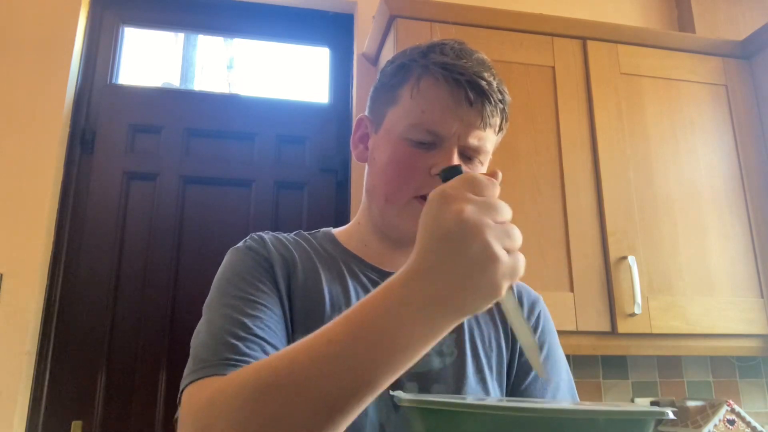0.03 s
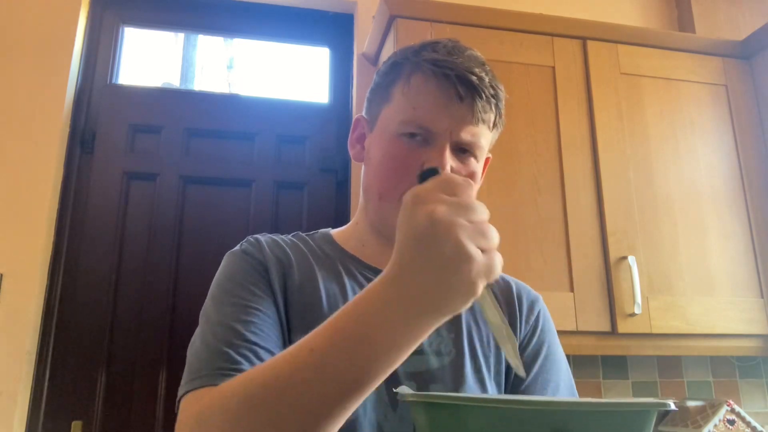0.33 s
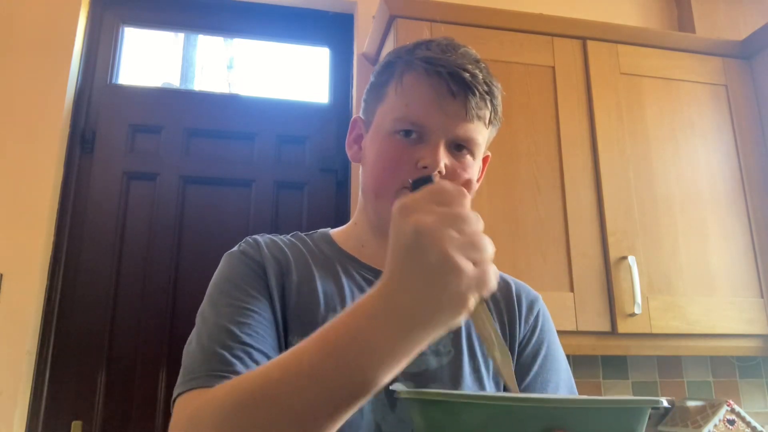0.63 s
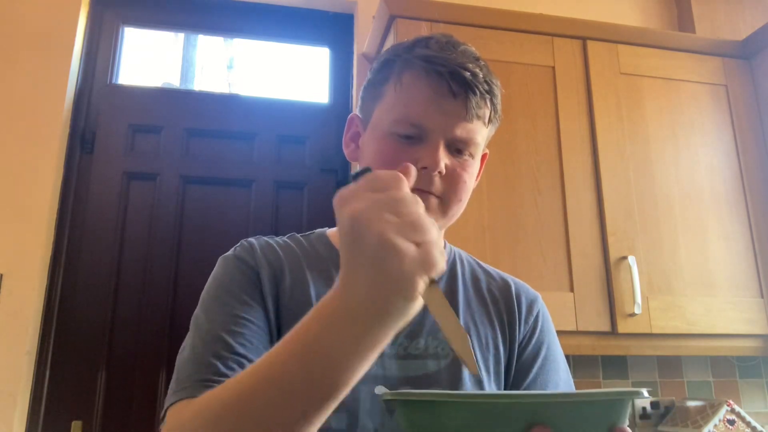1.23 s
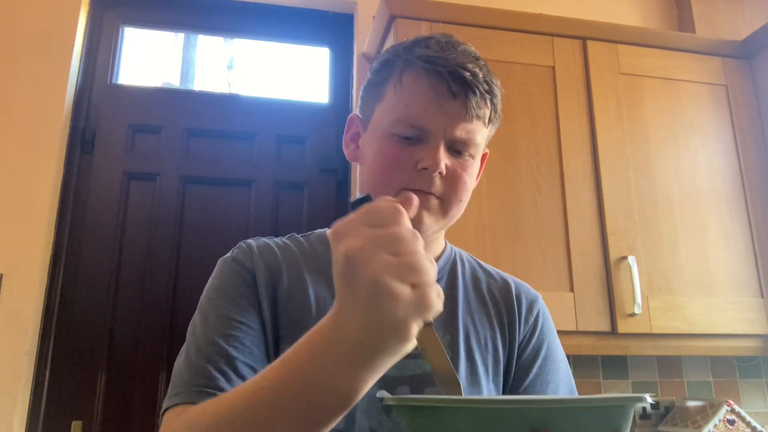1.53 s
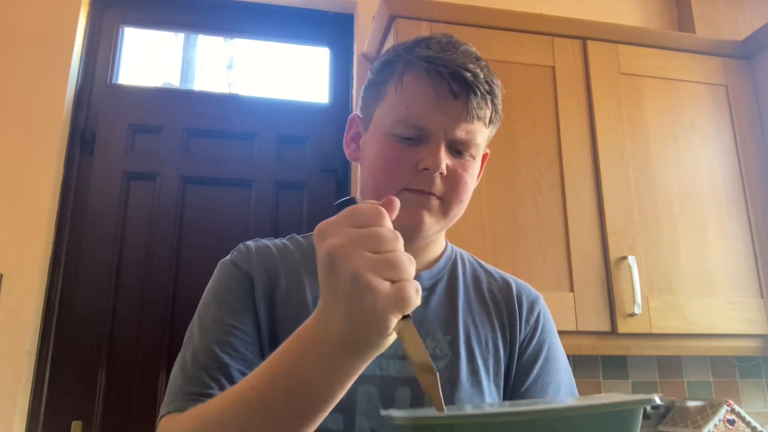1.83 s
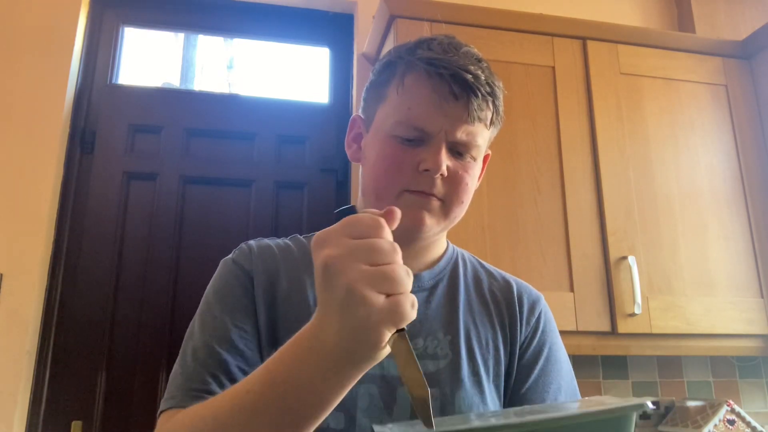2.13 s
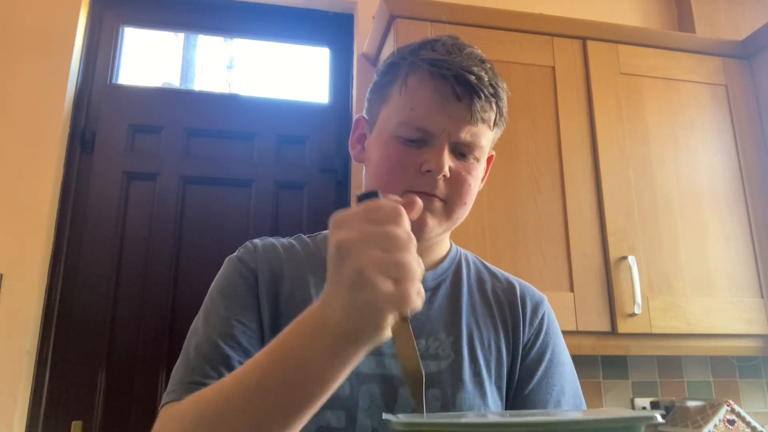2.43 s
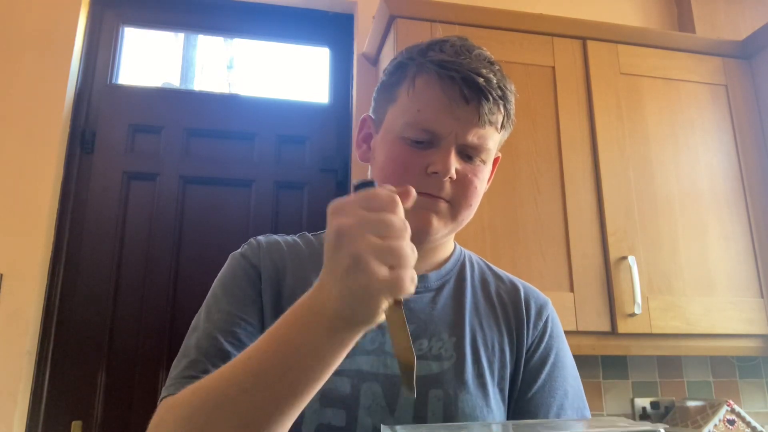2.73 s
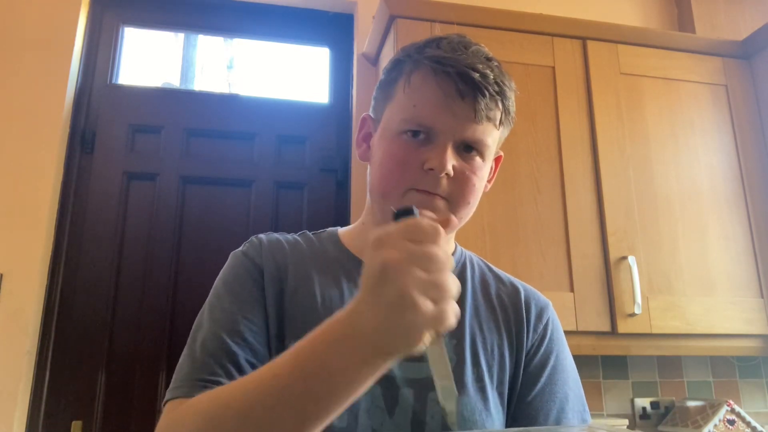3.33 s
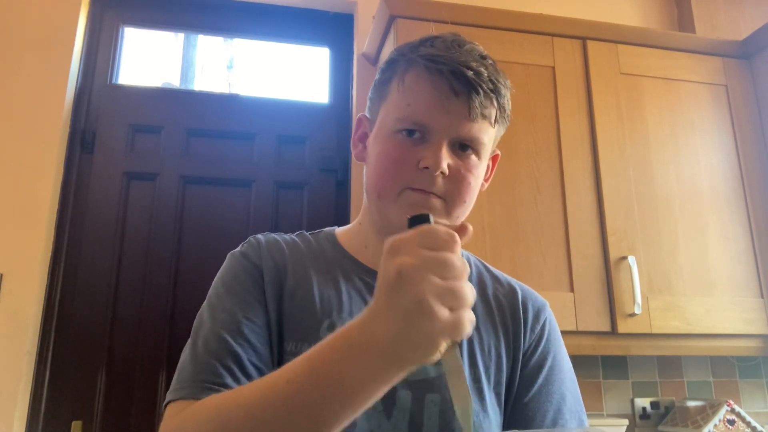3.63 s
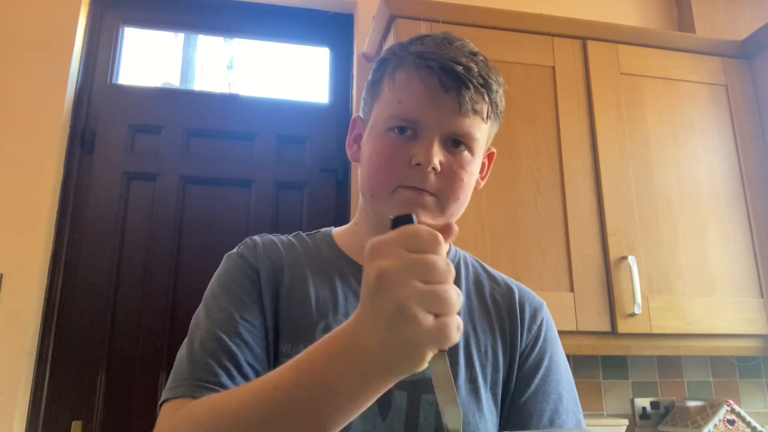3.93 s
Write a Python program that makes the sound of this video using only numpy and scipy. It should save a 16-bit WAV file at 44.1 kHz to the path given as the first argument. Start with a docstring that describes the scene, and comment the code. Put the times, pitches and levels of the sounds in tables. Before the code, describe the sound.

Sharp knife stabs crack into a plastic lid in two runs, close in a kitchen.

```python
"""A kitchen knife stabs repeatedly into the lid of a plastic tub, close to the microphone.
Each stab cracks sharply, rings the lid and pushes a falling thud out of the tub.
A brief, dull pre-echo from the recorder's processing leads into each crack.
Between stabs the blade scuffs the lid and ticks softly.
A hard-walled kitchen adds echoes and a short tail over a faint house rumble."""
import sys
import numpy as np
from scipy import signal
from scipy.fft import rfft, irfft, next_fast_len
from scipy.io import wavfile
from scipy.ndimage import uniform_filter1d

SR = 44100
rng = np.random.default_rng(int(sys.argv[2]) if len(sys.argv) > 2 else 0)


def inscribe(sig):
    """Save sig as 16-bit PCM at rate SR to the path in sys.argv[1].

    A 1-D sig is mono; a 2-D sig holds one channel per row.
    Samples are clipped to [-1, 1] before scaling.
    """
    pcm = np.round(np.clip(np.atleast_2d(sig).T, -1, 1) * 32767)
    wavfile.write(sys.argv[1], SR, pcm.astype(np.int16))


N = 176400
LEAD_IN = SR // 4  # samples before time zero
SPAN = N + LEAD_IN
SIZE = 8192  # samples per event
HZ = np.fft.rfftfreq(SIZE, 1 / SR)
T = np.arange(SIZE) / SR

# Knife stabs: start_s, level_db, hollow_db, knock_db, treble_db, low_ring_hz, high_ring_hz,
# thud_db, thud_pitch (proportional to the thud's end frequency)
STABS = [(-.115, -4, -1, 1, 1, 1070, 1960, -14, 110), (0.1444, -2, -3.5, -8.5, 0.5, 1140, 2020, -4.5, 120),
         (0.4081, -2, -13.5, -1.5, 3, 1240, 1975, -6, 101),
         (0.6658, -3.5, 5.5, -3, 4, 1160, 1900, -6.5, 105),
         (1.109, -4, 4.5, -5, 3.5, 1030, 1800, -1.5, 106), (1.4743, -3, 3.5, -7, 5, 1270, 2690, -3, 125),
         (2.4632, -3.5, -2, 4.5, 4, 850, 2745, -6.5, 113),
         (2.8225, -0.87, -1.5, -1, 2.2, 1130, 1930, -14.5, 110),
         (3.1069, 0.14, 3, -2, 2, 830, 1930, -11, 98), (3.374, .5, 7.5, -4.5, 3, 1110, 1920, -3.5, 102),
         (3.6728, -2, -1, -3.5, 2.5, 1290, 1920, -4, 126), (3.9086, -4.5, -2.5, -2, 6, 1050, 2100, -6, 153)]
# Lid crack spectrum: freq_hz, gain_db
CRACK_SPECTRUM = [(60, -12.5), (150, -12.5), (280, -1), (450, -7.5), (680, 3), (1100, 3.5), (1900, 3.5),
                  (2900, 1.5), (4300, 2.5), (5900, 2), (8300, -1.5), (10500, -6.5), (14000, -10.5),
                  (16000, -26)]
CRACK_DB = 13.5


def stabs(thud_gain_db=-20, thud_delay_s=0.0013):
    """The knife pierces the lid, ringing lid and tub. Returns cracks, stereo pre-echoes, thuds."""
    # Tub resonances: centre_hz, width_hz, peak_db
    tub_modes = [(635, 35, 7), (950, 35, 3), (1070, 40, 5), (1225, 30, 5), (1335, 30, 4), (1465, 35, 4),
                 (1700, 50, 2), (2830, 200, 3), (3750, 250, 2)]
    cracks, thuds, pre_echoes = np.zeros(SPAN), np.zeros(SPAN), np.zeros((2, SPAN))
    body_db = CRACK_DB + curve(CRACK_SPECTRUM, HZ) + sum(resonance_db(*mode) for mode in tub_modes)
    for start_s, level_db, hollow_db, knock_db, treble_db, low_hz, high_hz, thud_db, thud_pitch in STABS:
        tint = [(200, 0.022), (430, hollow_db), (900, knock_db),
                (1600, 0.021), (5000, 0), (9000, treble_db)]
        lid_db = resonance_db(low_hz, width_hz=190, peak_db=2)
        lid_db += resonance_db(high_hz, width_hz=260, peak_db=5)
        gain_db = level_db + body_db + curve(tint, HZ) + lid_db
        add(cracks, start_s, colour(snap(), gain_db))
        add(thuds, start_s + thud_delay_s, amp(thud_gain_db + thud_db) * thud(end_hz=0.65 * thud_pitch))
        for channel in pre_echoes:
            smear = pre_echo(gain_db)
            add(channel, start_s - len(smear) / SR, smear)
    return cracks, pre_echoes, thuds


def snap(hold_s=0.0016, decay_s=0.0016, grain_db=3.5, first_snap_db=-4):
    """The point breaks through with one snap; the plastic tears in a few ms of smaller ones."""
    envelope = np.exp(-np.maximum(T - hold_s, 0) / decay_s)
    noise = rng.standard_normal(SIZE)
    grain = amp(grain_db * np.clip(rng.standard_normal(SIZE), -2, 2))
    snaps = unit(noise * grain * envelope) + amp(first_snap_db) * (T == 0)
    return unit(whiten(snaps, bins=24) * np.sqrt(envelope))


def resonance_db(centre_hz, width_hz, peak_db):
    """Gain curve of one lid or tub mode."""
    return 10 * np.log10(1 + (amp(peak_db) ** 2 - 1) / (1 + (2 * (HZ - centre_hz) / width_hz) ** 2))


def thud(end_hz, start_hz=344, sag_s=0.0047, rise_s=0.0014, decay_s=0.015):
    """The tub is pushed down; its note falls as the lid slackens."""
    pitch_hz = end_hz + (start_hz - end_hz) * np.exp(-T / sag_s)
    envelope = (1 - np.exp(-T / rise_s)) * np.exp(-T / decay_s)
    return -np.sin(2 * np.pi * np.cumsum(pitch_hz) / SR) * envelope


def pre_echo(crack_db, relative_db=-14, rise_s=0.0054, top_hz=7600):
    """The recorder's processing smears dull noise ahead of a crack."""
    lowpass_db = -10 * np.log10(1 + (HZ / top_hz) ** 20)
    noise = unit(rng.standard_normal(SIZE) * np.exp(-T / rise_s))
    return colour(noise, crack_db + lowpass_db + relative_db)[:SIZE // 2][::-1]


def blade_scuffs(decay_s=0.021):
    """The blade knocks and scuffs the lid as it is drawn out."""
    # Light blade contacts: start_s, level_db, bass_db, treble_db
    touches = [(.300, -31, -12, -4), (.895, -31, 13, -15.5), (1.791, -28, 6.5, -11.5),
               (1.807, -41, 28, -16), (1.955, -43.5, 0.5, -13), (2.025, -49, -18.5, -14),
               (2.119, -49.5, 0, -11), (2.208, -46, 2, -12), (3.83, -23.5, 0, -4)]
    out = np.zeros(SPAN)
    for start_s, level_db, bass_db, treble_db in touches:
        tint_db = curve([(170, bass_db), (500, 0), (2500, 0.014), (8000, treble_db)], HZ)
        noise = rng.standard_normal(SIZE) * np.exp(-T / decay_s)
        scuff = unit(whiten(noise, bins=30) * np.exp(-T / decay_s / 10))
        add(out, start_s, colour(scuff, CRACK_DB + level_db + curve(CRACK_SPECTRUM, HZ) + tint_db))
    return out


def knife_ticks():
    """Tiny bright ticks of the knife in the hand."""
    # Dry ticks: start_s, level_db
    ticks = [(2.079, -34), (2.175, -38.5), (2.209, -41)]
    tint_db = curve([(750, -12), (1500, 0), (9000, -2), (15000, -8)], HZ)
    out = np.zeros(SPAN)
    for start_s, level_db in ticks:
        add(out, start_s, colour(snap(), level_db + tint_db))
    return out


def early_echoes(x):
    """Nearby surfaces return delayed copies to each side."""
    # Reflections: left_delay_s, right_delay_s, gain_db
    echoes = [(.0021, .0030, -9), (.0080, .0079, -8), (.0135, .0152, -28)]
    return sum(amp(gain_db) * np.array([delay(x, left_s), delay(x, right_s)])
               for left_s, right_s, gain_db in echoes)


def kitchen_tail(x, onset_s=0.0013, variants=4):
    """Dense reverberation, each band decaying at its own rate; stabs cycle through random tails."""
    # Room decay: freq_hz, t60_s
    room_t60 = [(80, 0.2), (210, 0.48), (560, 0.4), (1470, 0.44), (3880, 0.43), (7000, 0.4), (10200, 0.32),
                (15000, 0.21)]
    # Tone of the tail, with a recorder notch near 11.5 kHz: freq_hz, gain_db
    tail_tone = [(80, -2.5), (200, -7), (420, 1), (700, -1.5), (1400, 1), (2800, 2), (4400, 3), (6200, -9),
                 (9000, 5.5), (11500, -10), (14000, 7.5)]
    t, hz = np.arange(SR) / SR, np.fft.rfftfreq(SR, 1 / SR)
    onset = 1 - np.exp(-(t / onset_s) ** 2)
    stab_number = np.searchsorted([row[0] - .02 for row in STABS], np.arange(-LEAD_IN, N) / SR)
    out = np.zeros((2, SPAN))
    for k in range(variants):
        band_hz, frame_s, noise = signal.stft(rng.standard_normal((2, SR)), SR, nperseg=256)
        decay = 1000. ** (-frame_s / curve(room_t60, band_hz)[:, None])
        tails = signal.istft(noise * decay, SR, nperseg=256)[1][:, :SR]
        left, other = (rfft(unit(whiten(tail * onset, bins=200) * onset * (t < .8))) for tail in tails)
        response = irfft(room_stereo(left, other, hz) * amp(curve(tail_tone, hz)))[:, :SR * 3 // 4]
        send = x * (stab_number % variants == k)
        out += signal.fftconvolve(send[None], response, axes=1)[:, :SPAN]
    return out


def house_rumble(level_db=-64.5):
    """Quiet, steady low noise of the house."""
    # Background spectrum: freq_hz, relative_density_db
    floor_spectrum = [(20, -19), (40, -11.5), (60, 2.5), (100, -3.5), (200, -6.5), (300, -3), (450, -19.5),
                      (1000, -26), (3000, -45), (8000, -42), (16000, -48.5)]
    hz = np.fft.rfftfreq(N, 1 / SR)
    left, other = rfft(rng.standard_normal((2, N)))
    noise = irfft(room_stereo(left, other, hz) * amp(curve(floor_spectrum, hz)), N)
    return amp(level_db) * noise / noise.std()


def room_stereo(left, other, hz):
    """Mixes two independent spectra to the coherence of a room at two close microphone ports."""
    # Left-right likeness: freq_hz, coherence
    room_coherence = [(60, .96), (130, .9), (290, 0.67), (640, 0.29), (3000, 0.081), (7700, 0.22),
                      (15000, 0.16)]
    coherence = curve(room_coherence, hz)
    return np.array([left, coherence * left + np.sqrt(1 - coherence ** 2) * other])


def amp(db):
    return 10 ** (np.asarray(db) / 20)


def unit(x):
    """Scales to unit energy."""
    return x / np.sqrt(np.sum(x ** 2) + 1e-20)


def curve(points, hz):
    """Interpolates (freq_hz, value) points over log frequency."""
    freq_hz, value = np.transpose(points)
    return np.interp(np.log(hz + 1), np.log(freq_hz + 1), value)


def add(mix, start_s, sound):
    """Adds a sound to a mix that begins LEAD_IN samples early."""
    part = mix[max(round(start_s * SR) + LEAD_IN, 0):][:len(sound)]
    part += sound[:len(part)]


def delay(x, delay_s):
    """Fractional-sample delay."""
    size = next_fast_len(SPAN + SIZE)
    hz = np.fft.rfftfreq(size, 1 / SR)
    return irfft(rfft(x, size) * np.exp(-2j * np.pi * hz * delay_s), size)[:SPAN]


def colour(x, gain_db):
    """Minimum-phase filter; gain_db is given on HZ."""
    log_gain = np.log(amp(np.r_[gain_db, gain_db[-2:0:-1]]))
    response = np.exp(np.conj(signal.hilbert(log_gain)))[:len(HZ)]
    return irfft(rfft(x) * response)


def whiten(x, bins):
    """Flattens broad spectral bumps."""
    spectrum = rfft(x)
    power = abs(uniform_filter1d(abs(spectrum) ** 2, bins))
    return irfft(spectrum / np.sqrt(power + 1e-12), len(x))


def scene(thud_low_cut_hz=65, thud_send_db=-2):
    """Direct sound, pre-echoes, early echoes and kitchen tail over the rumble."""
    cracks, pre_echoes, thuds = stabs()
    thuds = signal.sosfilt(signal.butter(2, thud_low_cut_hz, "highpass", fs=SR, output="sos"), thuds)
    lid = cracks + blade_scuffs()
    near = lid + knife_ticks()
    room = early_echoes(near) + kitchen_tail(lid + amp(thud_send_db) * thuds)
    return (near + thuds + pre_echoes + room)[:, LEAD_IN:] + house_rumble()


def record(dry, ceiling=0.6, cutoff_hz=16200):
    """Frequency-dependent left-right phase and level shifts widen the image; soft clip; low-pass."""
    # Stereo phase shift from the recorder's processing: freq_hz, left_lead_rad
    stereo_phase = [(200, 0), (400, -.5), (630, -1.1), (1000, -.8), (1600, -2.2), (2450, -2.1),
                    (3700, -1.4), (5400, -3.3), (7700, -7.3), (10400, -10.6), (13400, -13.3), (16500, -15)]
    # Stereo balance: freq_hz, left_minus_right_db
    stereo_balance = [(60, 2), (150, 1.8), (400, 0), (700, -1.5), (1400, -0.5), (2800, -2.5), (5000, -1.5),
                      (9000, 0.5)]
    size = next_fast_len(N + SIZE)
    hz = np.fft.rfftfreq(size, 1 / SR)
    left_gain = amp(curve(stereo_balance, hz) / 2) * np.exp(.5j * curve(stereo_phase, hz))
    wide = irfft(rfft(dry, size) * np.array([left_gain, 1 / left_gain]), size)[:, :N]
    clipped = wide / (1 + (wide / ceiling) ** 4) ** .25
    lowpass = signal.firwin(511, cutoff_hz, window=("kaiser", 9), fs=SR)
    return signal.oaconvolve(clipped, lowpass[None], "same")


dry = scene()
out = record(dry)
inscribe(out)
```